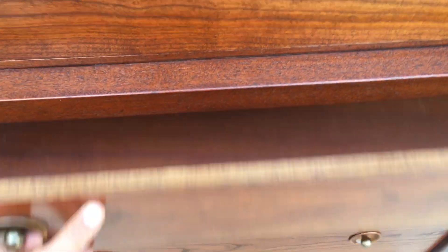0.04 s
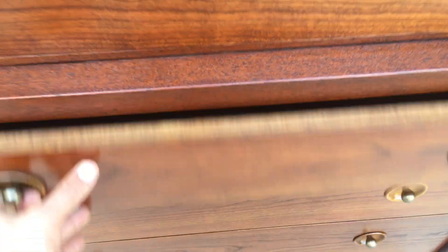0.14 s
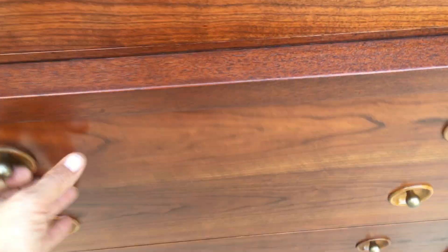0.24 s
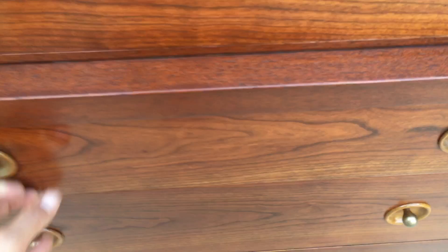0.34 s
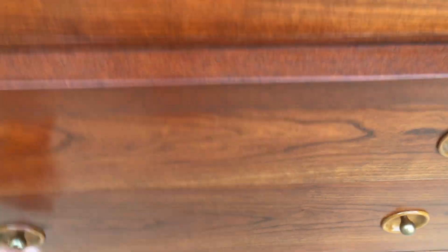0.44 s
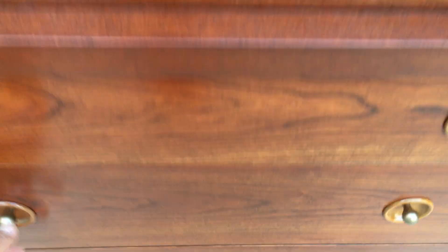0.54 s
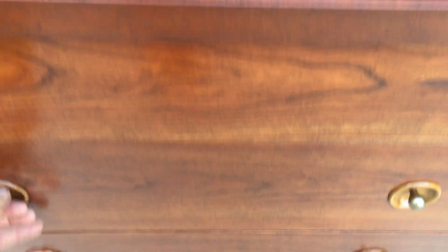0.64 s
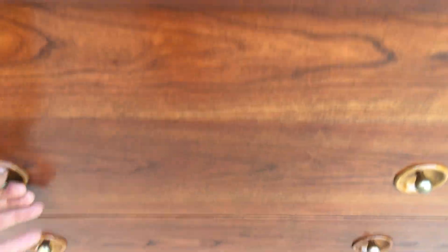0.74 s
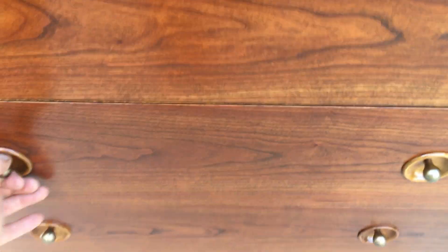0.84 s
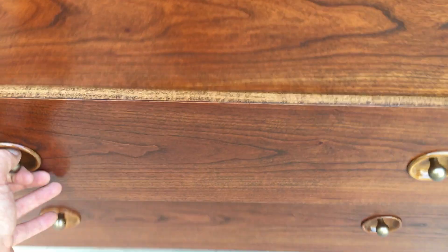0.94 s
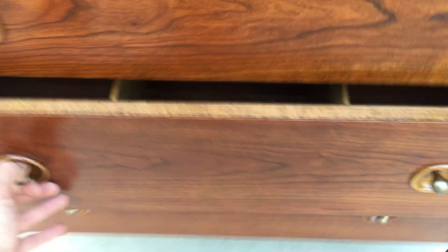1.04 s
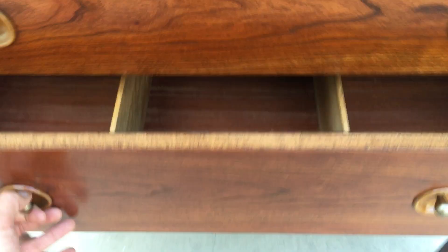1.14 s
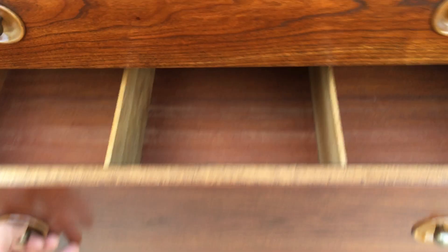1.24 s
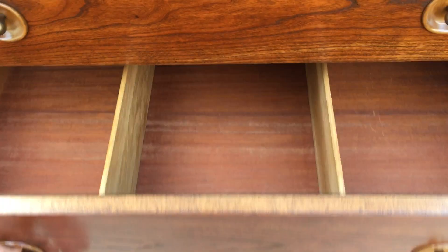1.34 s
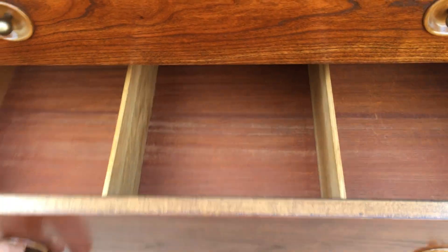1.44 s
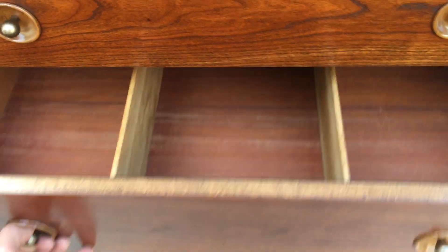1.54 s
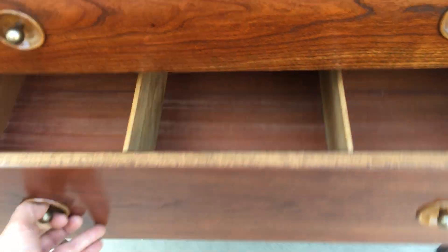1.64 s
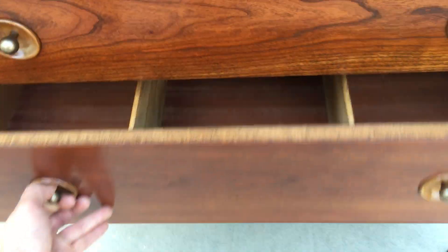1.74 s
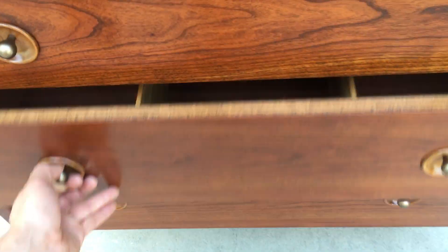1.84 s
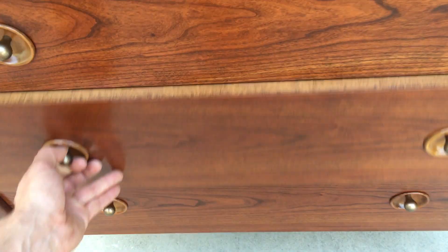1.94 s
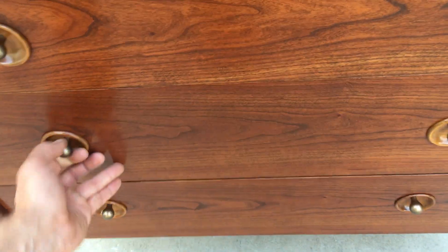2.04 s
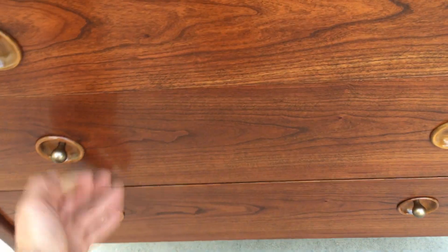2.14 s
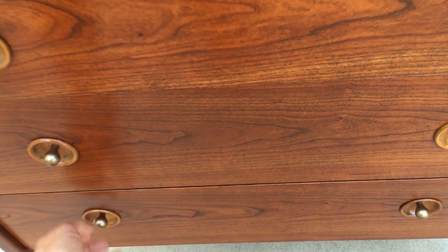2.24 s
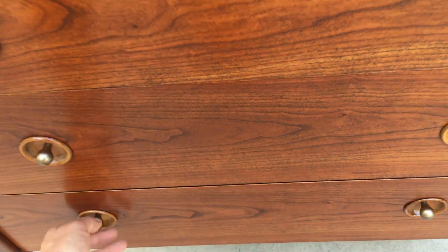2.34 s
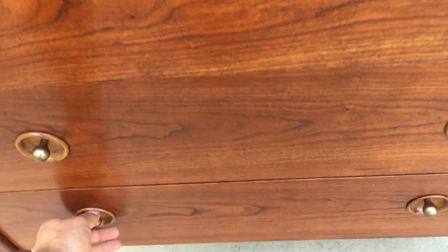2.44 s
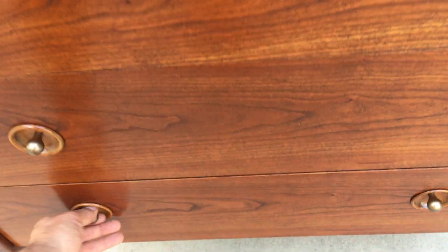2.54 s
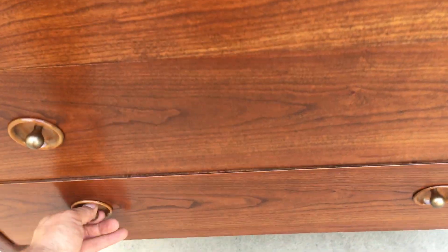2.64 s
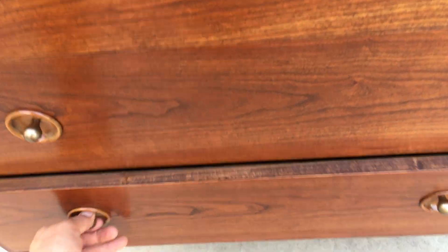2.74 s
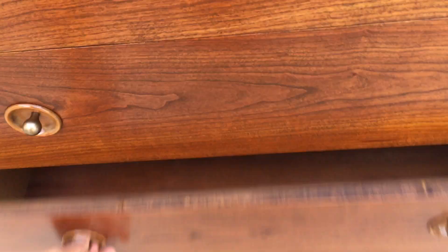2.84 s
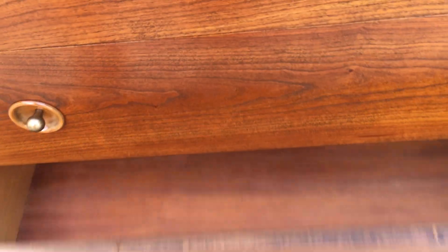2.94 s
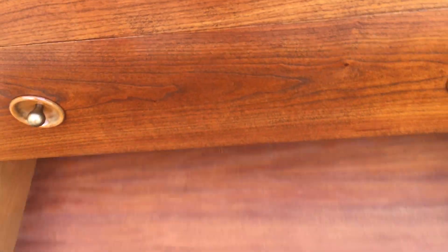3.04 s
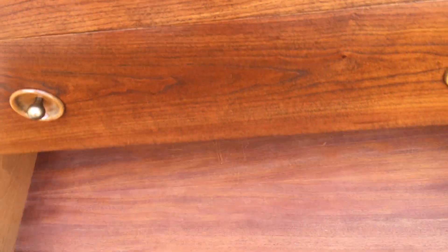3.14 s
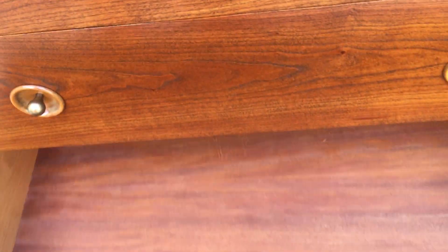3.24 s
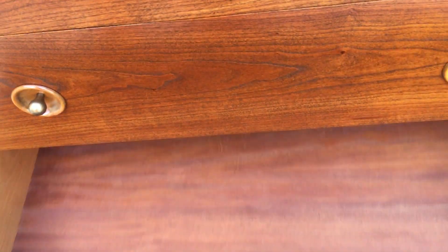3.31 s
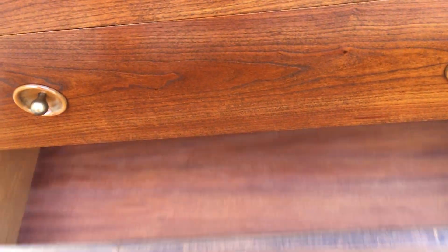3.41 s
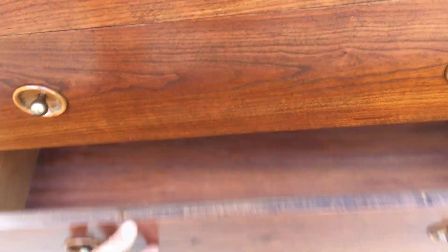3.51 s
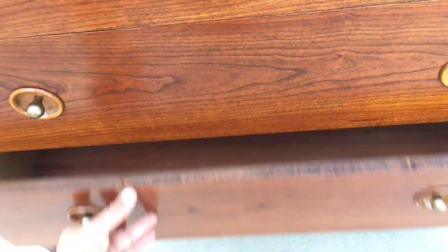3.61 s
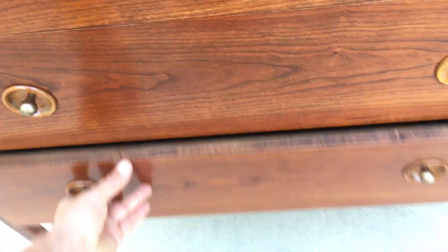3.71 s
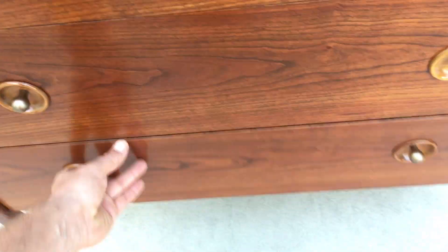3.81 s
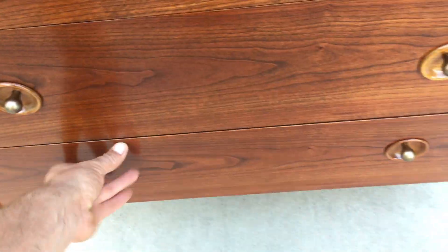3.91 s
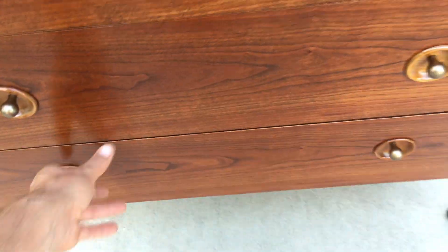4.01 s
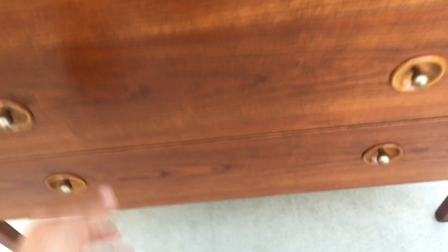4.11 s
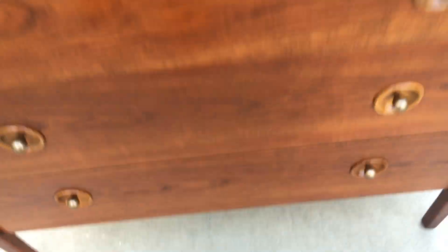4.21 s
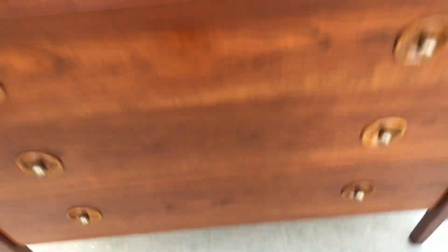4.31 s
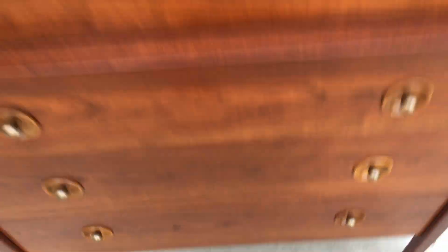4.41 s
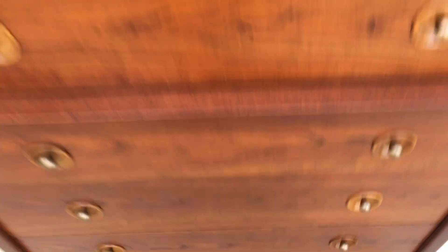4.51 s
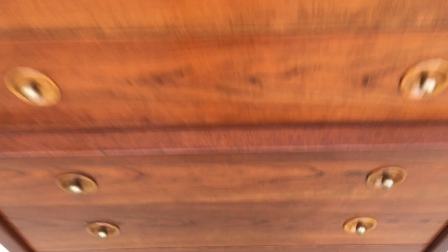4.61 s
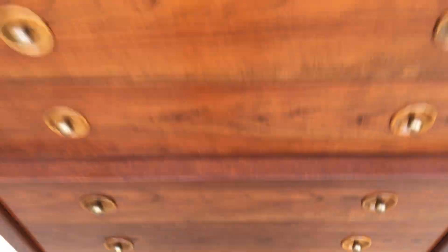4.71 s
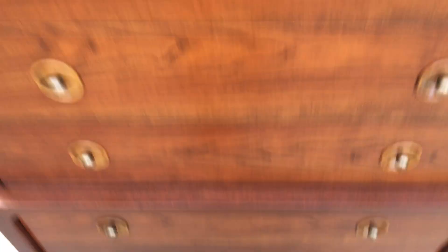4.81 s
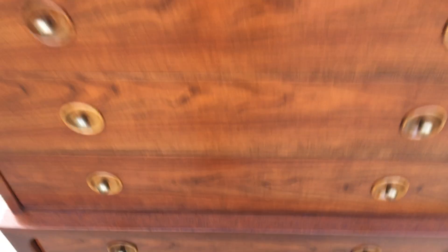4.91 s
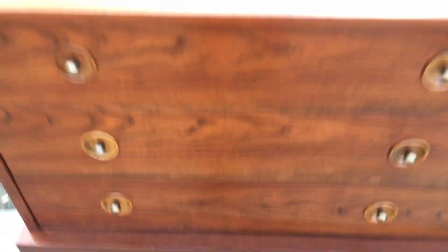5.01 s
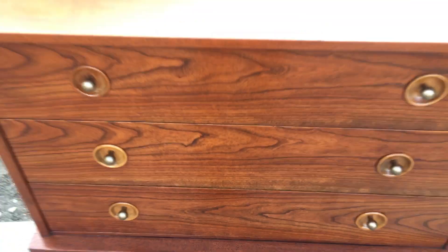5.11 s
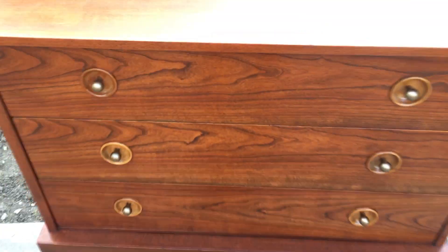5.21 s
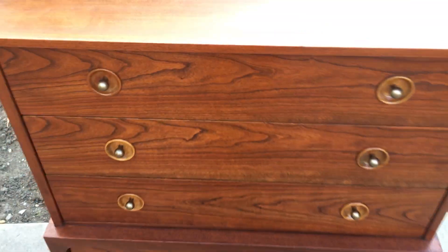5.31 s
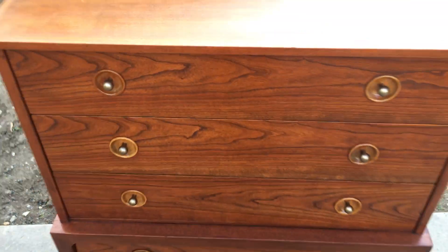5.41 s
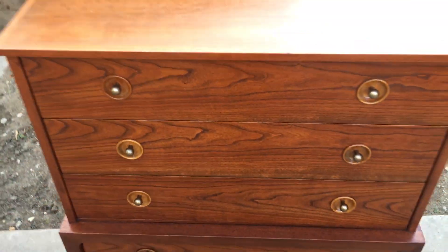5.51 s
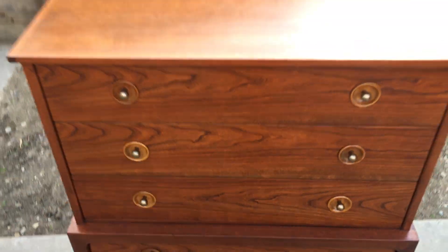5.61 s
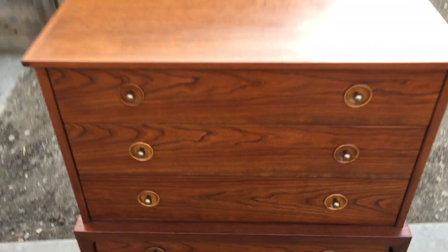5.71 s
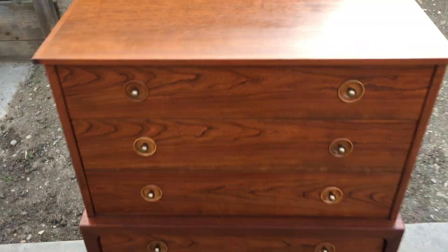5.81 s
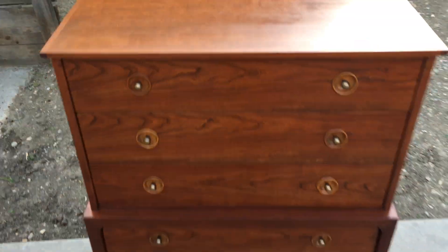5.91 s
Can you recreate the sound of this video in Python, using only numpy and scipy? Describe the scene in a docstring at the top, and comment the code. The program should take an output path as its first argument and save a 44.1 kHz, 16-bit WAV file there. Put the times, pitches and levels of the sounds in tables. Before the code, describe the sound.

A wooden drawer is sliding right from the start, close to the microphone, with a dry rasp and a low rumble, and knocks shut at about 0.4 seconds. After some soft bumps, a second drawer scrapes open from 1.1 seconds and hits its stop near 1.5 with a sharp clack of a metal handle. It judders back in and closes with a hollow knock at 2.1. Handles tick lightly, then a third drawer slides out from 2.7 to 3.3 seconds, is pushed back and bangs shut at 3.9. A shoe scuffs briefly just after 4 seconds. The rest is much quieter, with small cracks of grit underfoot around 5.1 and a soft shuffle at the end. Faint distant traffic runs under everything in the open air, with two barely audible chirps near 0.8 and 5.6 seconds.

```python
"""Three drawers of a wooden chest are pulled open and pushed shut, outdoors and close to a phone.
Their dry runners rasp in tiny slips and shake the hollow chest. Stops and drawer fronts knock it,
hands brush and bump it, and the metal handles tick. Then a shoe scuffs and grit cracks underfoot.
Distant traffic and two faint chirps lie behind it all."""
import sys
import numpy as np
from scipy import signal
from scipy.fft import rfft, irfft
from scipy.io import wavfile
from scipy.ndimage import uniform_filter1d

SR = 44100
rng = np.random.default_rng(int(sys.argv[2]) if len(sys.argv) > 2 else 0)


def unload_wav(signal):
    """Save mono or channel-first audio to the path in sys.argv[1] as 16-bit WAV at rate SR, clipped to [-1, 1]."""
    wavfile.write(
        sys.argv[1],
        SR,
        np.round(np.clip(np.atleast_2d(signal).T, -1, 1) * 32767).astype(np.int16),
    )


N = 262836

# Tone of rubbed wood: f/Hz, level/dB
RUB_TONE = [(880, -24), (1500, -1), (1980, -3), (2210, -2), (2880, -6), (3550, -2.5), (4550, -5.5),
            (4920, -6), (5490, -5), (7760, -12.5), (8570, -12.5), (10200, -15.5), (11200, -18),
            (14900, -26.5), (16000, -18)]
# Wood being rubbed: five drawer slides and two faint brushes of a hand (at 0.601 and 2.332 s):
# start t/s, fastest t/s, stop t/s, rasp level/dB at each of the three, then at full speed:
# brightness/(dB per octave), level/dB of thin panels, fronts, hum, boom
RUBS = [(-.02, .11, 0.42, -56.5, -48.5, -66.5, 3, -47, -47, -50, -42),
        (0.601, .78, 0.87, -82.5, -73, -80, 7, -58.5, -75, -52, -48),
        (1.08, 1.24, 1.497, -57, -49, -65, 2.5, -48.5, -53, -47, -43),
        (1.587, 1.825, 2.146, -65, -53.5, -67.5, 1, -54, -55, -45, -39),
        (2.332, 2.42, 2.6, -78.5, -70, -77, 5, -69, -72, -60, -51),
        (2.74, 3.03, 3.27, -70, -48.5, -64, 1.5, -49, -52, -43, -38),
        (3.39, 3.48, 3.92, -56, -52, -64, 2, -57, -55, -46, -48)]
HAND_OFF_S = 4.3  # a hand faintly rubs and shakes the chest until then

def wood_rasp():
    """Dry runners or a brushing hand catch and slip on the wood; a slower rub is softer and duller."""
    friction = colour(slips(per_second=11000, spread_db=-0.5), RUB_TONE)
    power = (undb(-78) * gate(0, HAND_OFF_S)) ** 2
    tilt = np.zeros(N)
    for rub in RUBS:
        start, drop_db, moving = rub_curve(*rub[:6])
        top_db, brightness = rub[4], rub[6]
        add(power, start, (moving * undb(top_db - drop_db)) ** 2)
        add(tilt, start, moving * (brightness - 0.2011 * drop_db))
    centres = 1000 * 2 ** np.arange(0, 4.1, .25)
    patches = wander(24.81)  # narrow patches of the wood sing up briefly
    rasp = np.zeros(N)
    for k, hz in enumerate(centres):
        tilt_db = tilt * np.log2(min(hz, 10000) / 4000)
        patch_db = 2 * np.roll(patches, k * N // len(centres))
        rasp += undb(tilt_db + patch_db) * band(friction, hz, hz / 6, order=1)
    return np.sqrt(power) * undb(0.39 * wander(33)) * rasp


# The chest's own notes (modes): f/Hz, level/dB, t60/s (the time to die away by 60 dB)
CHEST_MODES = [(48.14, -16, 0.1), (59.7, 3, 0.26), (65.4, 3, 0.41), (91, 5.5, 0.34), (106.7, 2.5, 0.31),
               (154.7, 3.5, 0.36), (201.5, 5, 0.24), (238.2, 4, 0.25), (264.3, -3.5, 0.34), (285, 0, 0.25),
               (347.6, -2, 0.22), (394, -8.5, 0.28), (472, 0, 0.12), (544.6, -3, 0.15), (593, -4.5, 0.2),
               (656, -9, 0.22), (780, 1, 0.046), (935.4, -2.5, 0.13), (1045, -8, 0.24), (1149, -2, 0.068),
               (1293, -6.5, .12), (1492.5, -14, 0.17), (1777, -5.5, 0.076), (2158, -9, 0.08)]

def struck_chest(t, level_at, body_share, panel_share, rise_cycles):
    """A blow starts all modes; level_at maps log f to dB, and the shares scale the ring times."""
    free_hz, mode_db, t60 = np.array(CHEST_MODES)[:, :, None].transpose(1, 0, 2)
    count, is_panel = len(CHEST_MODES), free_hz > 320
    level_luck, pitch_luck = rng.standard_normal((2, count, 1))
    hz = free_hz * (1 + (.01 + .02 * is_panel) * pitch_luck)  # the wood is held differently each time
    # low modes move the chest as a whole; higher neighbours swing opposite ways
    direction = np.where(free_hz < 125, 1, (-1.) ** np.arange(count)[:, None])
    steps = np.repeat(rng.standard_normal((count, len(t) // 150 + 1)), 150, axis=1)
    shiver = uniform_filter1d(steps, size=150)[:, :len(t)]
    rattle = 1 + .6 * is_panel * unit(shiver)  # loose joints roughen the panels' ring
    since = np.maximum(t - 0.0039 * ~is_panel, 0)  # the body answers just after the contact
    rise = 1 - np.exp(-since * hz / rise_cycles)
    decay = np.exp(-np.log(1000) * since / (t60 * np.where(is_panel, panel_share, body_share)))
    gain = direction * undb(level_at(np.log(free_hz)) + mode_db + 1.1 * level_luck)
    return np.sum(gain * rise * decay * rattle * np.sin(2 * np.pi * hz * since), axis=0)


# Hard blows: t/s, crack level/dB, its treble level/dB, crack t60/s, share of ring time left to the
# body, ring level/dB of sides, back, air inside, bottom boards, fronts, thin panels
KNOCKS = [(0.3883, -27.5, -37.5, 0.038, .6, -13, -12.5, -5.5, -30, -18, -28),
          (0.3992, -56, -58, 0.026, .64, -19, -32, -16, -38, -31, -35),
          (0.7908, -55, -69, 0.039, .58, -32, -37.5, -36, -51, -50, -62),
          (0.9448, -49, -68, 0.042, .7, -29, -37, -55, -41, -48, -57),
          (0.9747, -46.5, -63, 0.053, 1., -36, -42, -31.5, -49, -46, -43),
          (1.4907, -36, -40, 0.055, .55, -25, -25, -24, -12.5, -19.5, -31),
          (1.5564, -27, -47, 0.026, .44, -34, -26, -47, -26, -35, -43),
          (1.722, -31.5, -42, 0.047, .7, -43, -17, -32.5, -23, -36, -33),
          (1.741, -47, -52, 0.017, .79, -25, -18.5, -40, -33, -30, -48),
          (1.7683, -33.5, -44, 0.044, .54, -21, -47, -22, -39, -36, -30),
          (2.1258, -24.5, -39, 0.025, .66, -11.5, -14.5, -14.5, -10, -21, -30),
          (2.1423, -30.5, -65, 0.039, .72, -38, -11.5, -30, -32, -30, -38),
          (2.7327, -40, -57, 0.028, .87, -28, -36, -42.5, -37.5, -49, -53),
          (2.8842, -45, -51, 0.11, .57, -35, -53, -51, -47, -40, -58),
          (3.1176, -30.5, -53, 0.055, .93, -17.5, -52, -59, -25, -27, -27),
          (3.3588, -39.5, -52, 0.028, .8, -27.5, -35, -36.5, -38.5, -42, -52),
          (3.9275, -35, -44, 0.093, .92, -12.5, -16, -34.5, -28.5, -30, -29),
          (3.9437, -22, -38.5, 0.048, .84, -24, -18, -23.5, -22, -27, -29.5)]
# Where those six parts ring: f/Hz
PART_PITCHES = [60, 105, 150, 220, 400, 1200]
# Bands of a crack (wood swallows the treble first): f/Hz, level/dB, share of the crack's t60
CRACK_BANDS = [(1416, 5, 2.8), (2690, -0.5, 2.08), (4330, 7, 1.2), (7600, 7, 0.9), (13000, -4, .35)]

def drawer_knocks():
    """Stops and fronts hit the chest: a sharp crack, and the whole box rings."""
    out, t = np.zeros(N), np.arange(SR // 4) / SR
    for start, crack_db, treble_db, crack_t60, body_share, *part_db in KNOCKS:
        knock = struck_chest(t, lambda log_hz: np.interp(log_hz, np.log(PART_PITCHES), part_db) - 4.5,
                             body_share, panel_share=.97, rise_cycles=0.43)
        for hz, band_db, share in CRACK_BANDS:
            db = band_db + np.interp(hz, [3000, 8000], [crack_db, treble_db]) - 8
            burst = crack(t, max(share * crack_t60, .004))
            knock += undb(db) * np.sqrt(SR / hz / 4) * band(burst, hz, 0.57 * hz)
        add(out, start, knock)
    return out


# A drawer catches and judders: t/s, half length/s, level/dB of thin panels, fronts, hum, boom
CATCHES = [(.2, .03, -55, -50, -44, -38), (1.03, .05, -56, -60, -39, -38), (1.33, .06, -54, -50, -38, -36),
           (1.6, .05, -54, -50, -31, -28), (1.815, .055, -44, -40, -27, -34),
           (2.9, .04, -54, -48, -39, -38), (3.04, .03, -46, -50, -42, -42), (3.18, .04, -58, -45, -38, -34),
           (3.3, .04, -66, -54, -46, -44), (3.4, .04, -64, -55, -38, -34), (3.53, .03, -54, -49, -45, -55),
           (3.64, .08, -49.5, -51, -43, -36), (3.8, .04, -49, -54, -52, -42),
           (4.02, .05, -64, -53, -39, -40)]

def chest_shake():
    """Slips shake the chest as its wood is rubbed, and as drawers catch or shudder after a knock."""
    t = np.arange(SR // 3) / SR
    force = slips(per_second=1500, spread_db=3)
    # Thin panels, fronts, hum, boom: low f/Hz, high f/Hz, share of ring time the runners leave,
    # hand level/dB, dB lost per dB of rasp lost, shudder level/dB relative to the knock
    groups = [(730, 3000, .4, -67, .7, -23.5), (320, 730, .4, -81, .76, -23),
              (125, 320, .5, -60, .5, -17.5), (0, 125, .6, -47, .27, -18.5)]
    out, shudder_t60 = np.zeros(N), 0.38
    for k, (low, high, share, hand_db, loss, shudder_db) in enumerate(groups):
        ringing = sum(undb(db) * ring(force, hz, share * t60)
                      for hz, db, t60 in CHEST_MODES if low < hz <= high)
        power = (undb(hand_db) * gate(0, HAND_OFF_S)) ** 2
        for rub in RUBS:
            start, drop_db, moving = rub_curve(*rub[:6])
            add(power, start, (moving * undb(rub[7 + k] - loss * drop_db)) ** 2)
        for start, *_, sides, back, air, bottom, fronts, panels in KNOCKS:
            knock_db = (panels, fronts, max(air, bottom), max(sides, back))[k]
            add(power, start, undb(knock_db + shudder_db - 60 * t / shudder_t60) ** 2)
        for middle, half, *catch_db in CATCHES:
            swell = np.exp(-(t / half - 2) ** 2)
            add(power, middle - 2 * half, (undb(catch_db[k]) * swell) ** 2)
        out += np.sqrt(power) * unit(ringing)
    return out


# Pushes from hands and lurching drawers: t/s, boom level/dB, hum level/dB
BUMPS = [(0.009, -20.5, -58), (0.171, -20, -34.5), (0.216, -32, -44), (0.63, -26, -57), (0.679, -25, -54),
         (0.892, -24.5, -59), (1.309, -24, -27.5), (1.394, -27, -40), (1.525, -20, -19.5),
         (1.843, -30, -27.5), (2.004, -32, -50), (2.775, -31, -37), (2.849, -23, -50), (2.953, -24.5, -39),
         (3.093, -19, -45), (3.218, -31, -38.5), (3.394, -21, -38.5), (3.638, -27, -33.5),
         (3.779, -32, -46)]

def soft_bumps():
    """Soft pushes stir mostly the low modes, and a hand cuts their ring short."""
    out, t = np.zeros(N), np.arange(SR // 6) / SR
    for start, boom_db, hum_db in BUMPS:
        levels = [boom_db, hum_db, hum_db - 18.5]
        bump = struck_chest(t, lambda log_hz: np.interp(log_hz, np.log([60, 150, 500]), levels) - 5,
                            body_share=0.58, panel_share=1, rise_cycles=0.6)
        add(out, start, bump)
    return out


# Handle ticks: t/s, level/dB, ringing share (0 to 1)
HANDLE_TICKS = [(0.174, -51.5, 0.5), (1.0054, -45, 0.4), (1.5565, -21.5, 0.5), (1.5899, -31, 0.35),
                (1.6062, -37, 0.37), (2.382, -43.5, 0.2), (2.493, -46, 0.4), (2.574, -47, 0.5),
                (3.9164, -37, 0.3), (4.0304, -49, 0.3)]
# Notes of a metal handle: f/Hz, width/Hz, level/dB
HANDLE_MODES = [(2038, 162, 12), (3270, 400, -3), (4440, 320, 6), (5530, 440, -5), (6560, 1100, -5)]

def handle_ticks():
    """Loose handles clack on their plates: a dry click, with a brief ring when they swing free."""
    out, t = np.zeros(N), np.arange(SR // 5) / SR
    for start, tick_db, share in HANDLE_TICKS:
        click = crack(t, t60=0.044)
        ringing = sum(undb(db) * band(click, hz, width) for hz, width, db in HANDLE_MODES)
        tick = share * ringing + (1 - share) * 0.32 * band(click, 6800, 9600)
        add(out, start, undb(tick_db - 6) * tick / np.abs(tick).max())
    return out


# Grains of grit: t/s, level/dB, treble level/dB
GRIT = [(4.0672, -56, -59), (4.0786, -48, -56), (4.951, -63, -66), (5.0954, -62, -63), (5.114, -58, -62),
        (5.1233, -57, -60), (5.1483, -44, -55), (5.1595, -43, -55), (5.17, -49, -70), (5.221, -48, -64),
        (5.236, -49, -65), (5.2904, -55, -73), (5.8792, -57, -67)]

def grit_cracks():
    """Each grain cracks under a shoe with one short click."""
    out, t = np.zeros(N), np.arange(SR // 20) / SR
    for start, db, treble_db in GRIT:
        click = crack(t, t60=.02)
        add(out, start, undb(db + 7) * band(click, 2400, 2640))
        add(out, start, undb(treble_db + 8) * band(click, 8200, 6600))
    return out


# A shoe turning on concrete: start t/s, fastest t/s, stop t/s, level/dB at each of the three
SCUFF = (4.085, 4.14, 4.225, -59, -50, -58)
# Tone of that scuff: f/Hz, level/dB
SCUFF_TONE = [(470, -42), (800, -6), (1680, -3.5), (2100, -1), (4800, -11.5), (5800, -11), (9100, -17),
              (14700, -20), (16000, -33.5)]

def shoe_scuffs():
    """Soles rub the ground in tiny slips: one scuff, then a soft shuffle at the end."""
    start, drop_db, moving = rub_curve(*SCUFF)
    scuff = np.zeros(N)
    add(scuff, start, moving * undb(SCUFF[4] - drop_db))
    shuffle = undb(-73) * gate(5.7, N / SR + 1)
    out = np.zeros(N)
    for loudness, tone in ((scuff, SCUFF_TONE), (shuffle, RUB_TONE)):
        rub = colour(slips(per_second=6000, spread_db=2), tone)
        out += loudness * undb(1.5 * wander(34)) * rub
    return out


# Faint chirps: start t/s, end t/s, f/Hz, level/dB
CHIRPS = [(.74, .82, 3850, -70), (5.57, 5.73, 4100, -76)]

def far_chirps():
    """Thin, wavering notes far away, made of noise ringing at one pitch."""
    return sum(undb(db) * gate(start, end) * unit(ring(rng.standard_normal(N), hz, t60=0.055))
               for start, end, hz, db in CHIRPS)


# Tone of traffic and air: f/Hz, level/dB
TRAFFIC_TONE = [(15, -45), (25, -6), (59, 1.5), (82, 3.5), (134, -5.5), (200, -4.5), (439, -22),
                (607, -18.5), (1840, -23), (2840, -33), (8830, -43), (14800, -49.5), (16000, -55)]

def distant_traffic():
    """A low rush of traffic and air that swells a little."""
    return undb(-49 + 0.21 * wander(2.7)) * colour(rng.standard_normal(N), TRAFFIC_TONE)


def rub_curve(start, fastest, stop, start_db, top_db, stop_db):
    """A rub's first moment, its drop in dB from full speed, and a gate that is 1 while it moves."""
    grip_s = 0.038  # time to get going and to stop
    t = np.arange(max(start - grip_s, 0), stop + grip_s, 1 / SR)
    before = np.clip((fastest - t) / (fastest - start), 0, 1)
    after = np.clip((t - fastest) / (stop - fastest), 0, 1)
    drop_db = (top_db - start_db) * before ** 1.45 + (top_db - stop_db) * after ** 1.33
    moving = np.clip(1 + np.minimum(t - start, stop - t) / grip_s, 0, 1)
    return t[0], drop_db, moving


def slips(per_second, spread_db):
    """A surface catching and letting go: clicks of random size at random times."""
    hit = rng.random(N) < per_second / SR
    return hit * rng.standard_normal(N) * undb(spread_db * np.minimum(rng.exponential(size=N), 4))


def crack(t, t60):
    """A sudden burst of noise that dies away."""
    return rng.standard_normal(len(t)) * np.exp(-np.log(1000) * t / t60) * (1 - np.exp(-t / 0.0002))


def ring(x, hz, t60):
    """Let x set one fading note ringing."""
    pole = np.exp(2j * np.pi * hz / SR - np.log(1000) / (t60 * SR))
    return signal.lfilter([1], [1, -pole], x).imag


def band(x, hz, width_hz, order=2):
    """Keep the frequencies around hz."""
    edges = [hz - width_hz / 2, min(hz + width_hz / 2, .45 * SR)]
    return signal.sosfilt(signal.butter(order, edges, "band", fs=SR, output="sos"), x)


def colour(x, tone):
    """Shape x by a tone table of (f/Hz, level/dB) points; the result has size 1."""
    hz, db = np.transpose(tone)
    bins = np.arange(len(x) // 2 + 1) * SR / len(x) + 1
    gain = undb(np.interp(np.log(bins), np.log(hz), db))
    return unit(irfft(rfft(x) * gain, len(x)))


def wander(per_second):
    """A smooth random drift of size 1."""
    hold = int(SR / per_second)
    steps = np.repeat(rng.standard_normal(N // hold + 1), hold)
    return unit(uniform_filter1d(uniform_filter1d(steps, hold), hold)[:N])


def gate(start, end):
    """1 between two times, with short fades; from time 0 it only fades out."""
    t = np.arange(N) / SR
    ramp = np.minimum(t - start, end - t) / 0.036 if start > 0 else (end - t) / 0.061
    return np.clip(ramp, 0, 1)


def add(out, start, x):
    """Mix x into out from start, in seconds."""
    i = int(start * SR)
    out[i:i + len(x)] += x[:len(out) - i]


def undb(db):
    """Turn decibels into a multiplier."""
    return np.exp(np.asarray(db) * (np.log(10) / 20))


def unit(x):
    """Scale to an average size (rms) of 1."""
    return x / np.sqrt(np.mean(x ** 2))


def scene():
    """Chest, feet and background all reach one microphone."""
    chest = wood_rasp() + chest_shake() + drawer_knocks() + soft_bumps() + handle_ticks()
    return (chest + grit_cracks() + shoe_scuffs() + far_chirps() + distant_traffic())[None]


# Bands weakened by the phone's microphone opening: f/Hz, width/Hz, level/dB
MIC_DIPS = [(4900, 220, -6.5), (10350, 1050, -4.5)]

def record(dry):
    """The phone drops the deepest bass, weakens two bands and cuts the highest treble."""
    x = signal.sosfilt(signal.butter(4, 43, "high", fs=SR, output="sos"), dry)
    for hz, width_hz, db in MIC_DIPS:
        x = x - (1 - undb(db)) * band(x, hz, width_hz, order=1)
    return signal.sosfilt(signal.ellip(12, .5, 60, 15740, fs=SR, output="sos"), x)


dry = scene()
out = record(dry)
unload_wav(out)
```